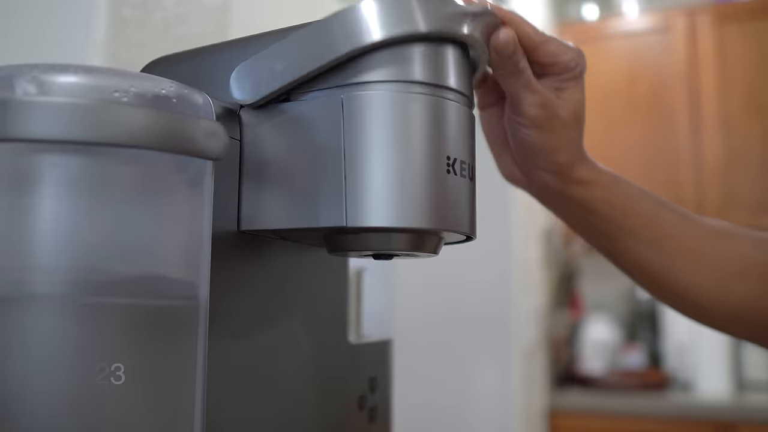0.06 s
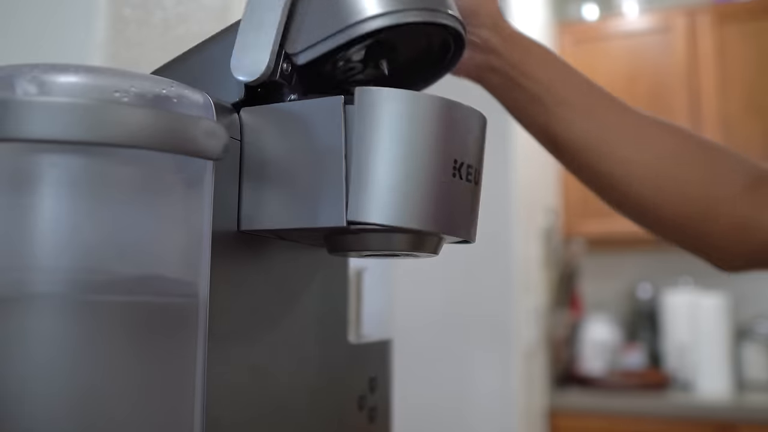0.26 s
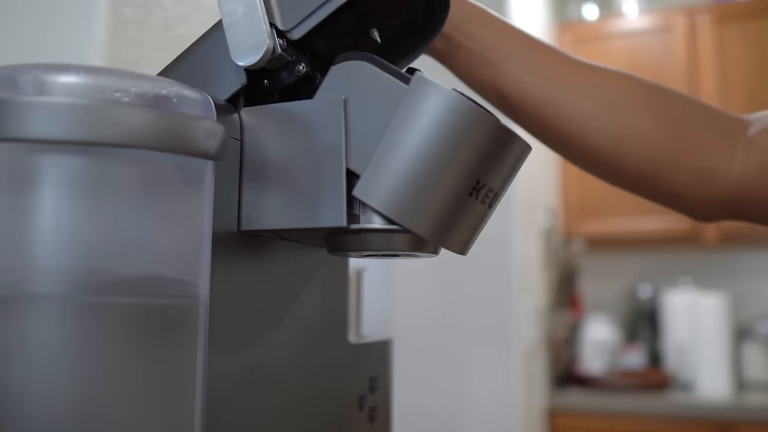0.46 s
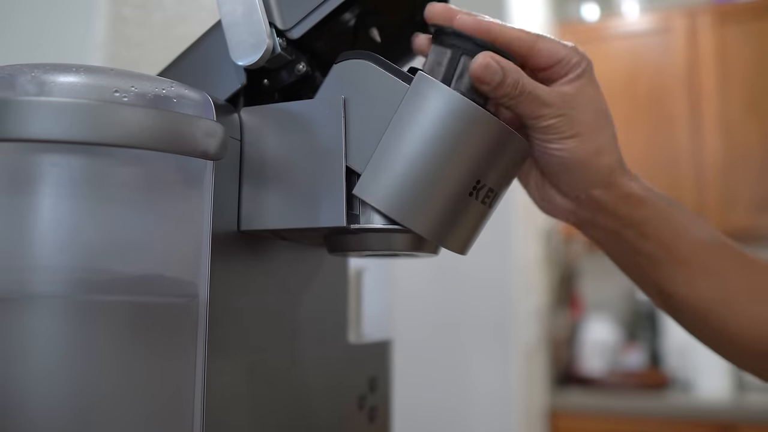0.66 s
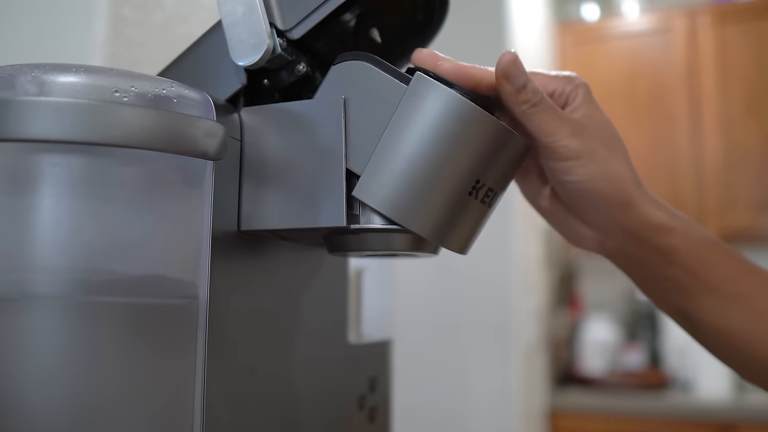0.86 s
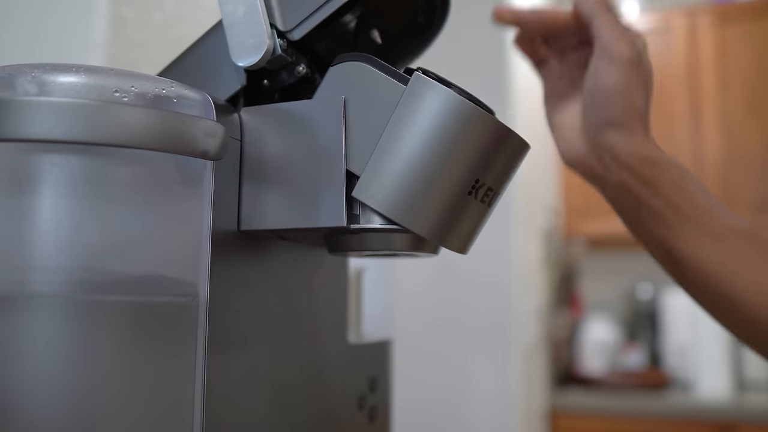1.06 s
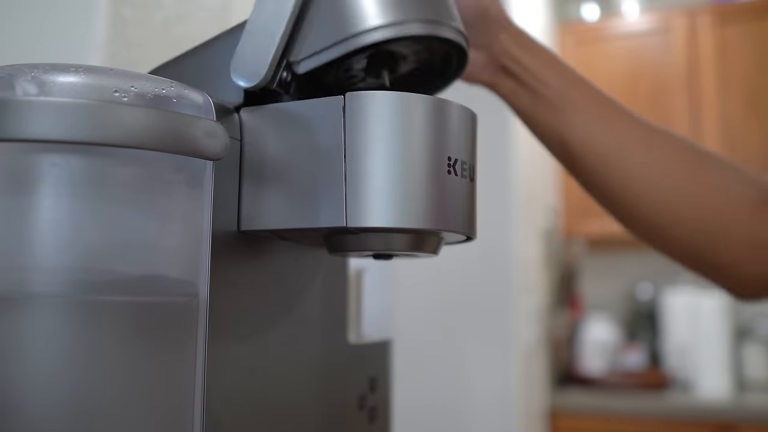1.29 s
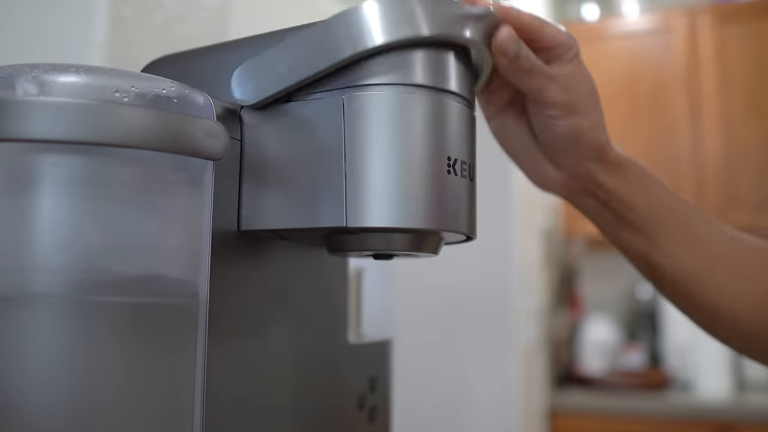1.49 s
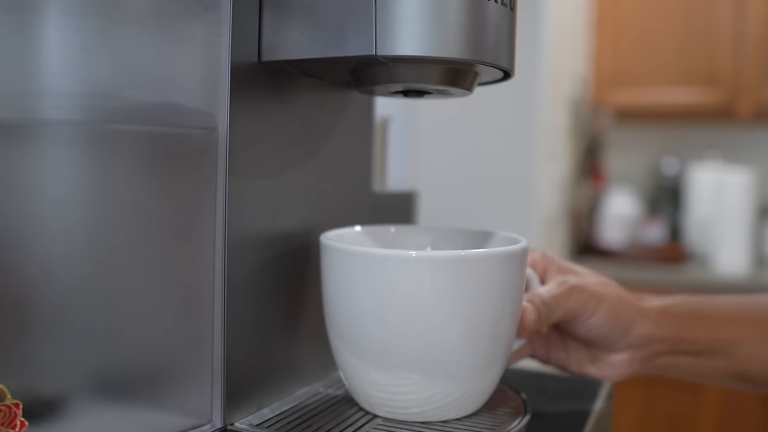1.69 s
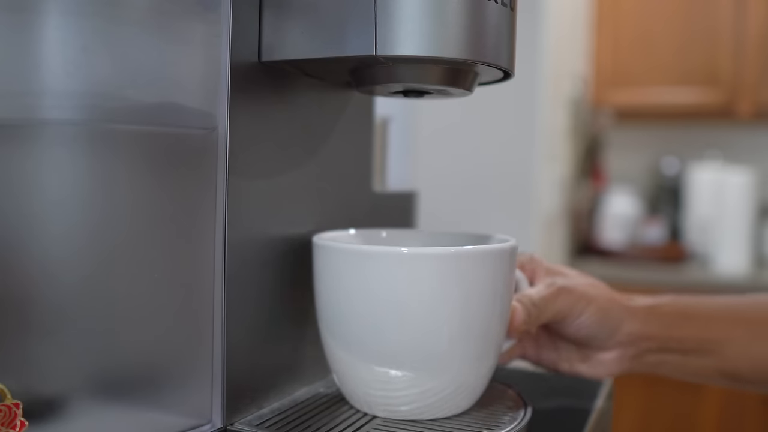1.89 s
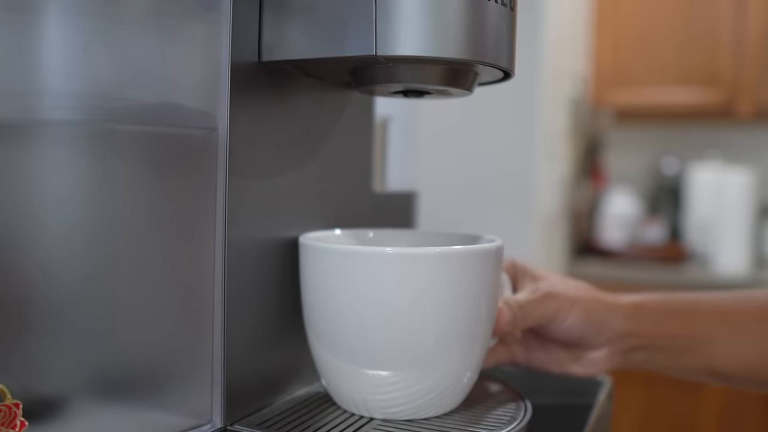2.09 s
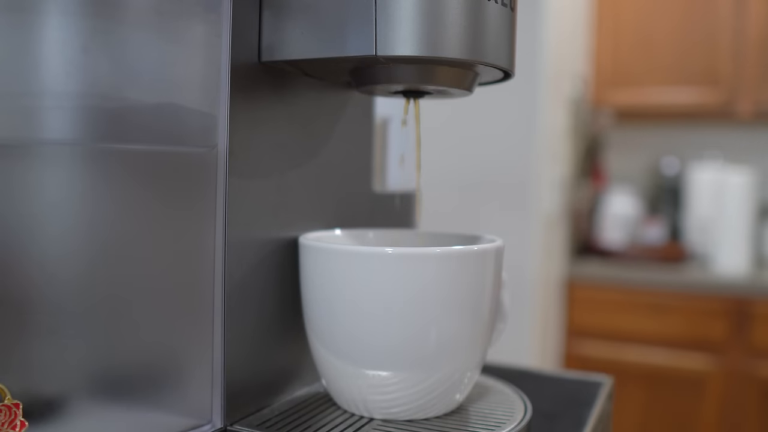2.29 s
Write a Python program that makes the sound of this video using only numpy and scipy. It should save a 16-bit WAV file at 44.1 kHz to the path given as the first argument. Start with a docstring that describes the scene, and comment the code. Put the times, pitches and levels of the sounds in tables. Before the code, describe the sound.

Close plastic clicks and clunks as a coffee machine is opened, loaded with a pod and clamped shut. A china mug then knocks onto the hollow tray, slides squeaking and settles, over a low hum in a small kitchen.

```python
"""A coffee machine in a small kitchen, close by, over a mains hum and low room rumble. Its plastic lid
unlatches and swings up, a pod is dropped in and pressed home, and the lid is clamped shut, shaking the
counter. These sounds stop abruptly. Then a china mug lands ringing on the hollow drip tray, scrapes
and squeaks into place and settles with a soft bump; last, fingers tick off its handle."""
import sys
import numpy as np
from scipy import signal
from scipy.fft import rfft, irfft
from scipy.io import wavfile
from scipy.ndimage import uniform_filter1d

SR = 44100
rng = np.random.default_rng(int(sys.argv[2]) if len(sys.argv) > 2 else 0)


def transcribe(u):
    """Save the signal u as a 16-bit wav file named by the first command-line argument.

    u: samples, shape (n,) or (channels, n), limited to [-1, 1]; the rate is SR.
    q: integer samples, one column per channel.
    """
    v = np.clip(np.atleast_2d(u).T, -1, 1)
    q = np.round(v * 32767).astype(np.int16)
    wavfile.write(sys.argv[1], SR, q)


N = 108045
TIME = np.arange(N) / SR


def amp(db):
    """Decibels to gain."""
    return 10 ** (np.asarray(db) / 20)


def unit_rms(x):
    """Scales to rms 1."""
    return x / np.sqrt(np.mean(x ** 2) + 1e-20)


def at_hz(points, hz):
    """Reads a table on a log-frequency axis."""
    f, value = np.transpose(points)
    return np.interp(np.log(hz + 1), np.log(f + 1), value)


def fader(points):
    """Gain over time from a level curve, silent outside it."""
    s, db = np.transpose(points)
    return amp(np.interp(TIME, s, db)) * (TIME >= s[0]) * (TIME <= s[-1])


def add(mix, s, sound):
    """Mixes a sound in at time s."""
    part = mix[max(round(s * SR), 0):][:len(sound)]
    part += sound[:len(part)]


def eq(x, points, lo_hz=0, hi_hz=SR):
    """Filters by a dB spectrum, between two soft band edges."""
    hz = np.fft.rfftfreq(x.shape[-1], 1 / SR) + 1
    band = 1 / np.sqrt((1 + (lo_hz / hz) ** 10) * (1 + (hz / hi_hz) ** 10))
    return irfft(rfft(x) * amp(at_hz(points, hz)) * band, x.shape[-1])


def noise(colour, lo_hz=0, hi_hz=SR):
    """Coloured noise of rms 1."""
    return unit_rms(eq(rng.standard_normal(N), colour, lo_hz, hi_hz))


def wander(hz):
    """Smooth random motion of rms 1."""
    return noise([(1, 0)], hi_hz=hz)


def ring(modes, attack_s=0.0016):
    """A struck part rings as dying sines of random phase."""
    t = TIME[:SR // 2]
    sines = (amp(db - 60 * t / t60) * np.sin(2 * np.pi * (hz * t + rng.random()))
             for hz, db, t60 in modes)
    return np.minimum(t / attack_s, 1) * sum(sines)


def with_send(sound, room_db):
    """Pairs a direct sound with its room send."""
    return np.array([sound, sound * amp(room_db)])


# room tone, heavy in the lows (frequency [Hz], level [dB])
ROOM_TONE = [(15, -33), (25, -10.5), (114, -6), (223, -12), (840, -31.5), (1130, -38), (1520, -35.5),
             (1650, -36.5), (3430, -40), (14000, -40), (16000, -39)]
# stereo width of the room (frequency [Hz], side against mid [dB])
ROOM_WIDTH = [(150,-22.5),(350,-15),(700,-6.5),(1400,-8),(2800,-4.5),(7000,-0.5),(14000,-5)]
def background(tone_db=-50.5, hum_hz=121.6, hum_db=-51.5):
    """Room rumble, faint hiss and mains hum."""
    mid = amp(tone_db) * noise(ROOM_TONE)
    side = eq(amp(tone_db) * noise(ROOM_TONE), ROOM_WIDTH)
    hum = amp(hum_db) * unit_rms(np.sin(2 * np.pi * hum_hz * TIME))
    return mid + np.array([side, -side]) + hum


def reflections(t60, gap_s):
    """Dense, evenly coloured reflections after a gap, each band dying at its own speed."""
    hz, t, bands = signal.stft(rng.standard_normal(SR), SR, nperseg=256)
    decay = amp(-60 * t / at_hz(t60, hz)[:, None])
    tail = signal.istft(bands * decay, SR, nperseg=256)[1][:SR]
    spectrum = rfft(np.roll(tail, round(gap_s * SR)))
    colour = np.sqrt(uniform_filter1d(abs(spectrum) ** 2, size=45))
    tail = irfft(spectrum / colour, SR) * (TIME[:SR] > gap_s) * (TIME[:SR] < .7)
    return tail / np.linalg.norm(tail)


# reverb decay (frequency [Hz], t60 [s])
ROOM_DECAY = [(150,0.53),(400,0.51),(1000,0.45),(2800,0.38),(7000,0.25),(15000,0.24)]
# stereo width of the scatter off the machine (frequency [Hz], side against mid [dB])
SCATTER_WIDTH = [(150,-44.5),(600,-16),(1300,-15),(2500,-7),(7000,-6),(14000,-6.5)]
def kitchen(direct, send, scatter_t60=0.012):
    """Direct sound, scatter off the machine that spreads it left and right, and the room's tail."""
    scatter = signal.fftconvolve(direct, reflections([(1000, scatter_t60)], gap_s=0.00121))[:N]
    wet_mid, wet_side = (signal.fftconvolve(send, reflections(ROOM_DECAY, gap_s=.004))[:N]
                         for _ in range(2))
    side = eq(scatter, SCATTER_WIDTH) + eq(wet_side, ROOM_WIDTH)
    return direct + wet_mid + np.array([side, -side])


def rub(curve, colour, chatter_db, chatter_hz, room_db, grains_per_s=9000, spread_db=1):
    """Stick-slip grains, unevenly pressed, coloured by the rubbed part; gives direct and send."""
    sizes = amp(spread_db * np.minimum(rng.exponential(1, N), 4))
    grains = sizes * rng.standard_normal(N) * (rng.random(N) < grains_per_s / SR)
    pressure = amp(chatter_db * wander(chatter_hz))
    return with_send(fader(curve) * unit_rms(eq(grains * pressure, colour)), room_db)


# a knock's thud, body, clack and tick bands (low [Hz], high [Hz], t60 [s], room send [dB])
KNOCK_BANDS = [(131,530,0.065,-5),(558,2290,0.051,-8),(2430,5240,0.045,-8),(5470,34300,0.016,-10)]
def knocks(hits, colour, modes):
    """Each knock swells, then dies as a noise burst and any ringing modes; gives direct and send."""
    out, t = np.zeros((2, N)), TIME[:SR // 2]
    for s, rise_s, *levels in hits:
        swell = np.minimum(t / rise_s, 1) ** 2
        for db, (lo, hi, t60, room_db) in zip(levels, KNOCK_BANDS):
            envelope = swell * amp(-60 * np.maximum(t - rise_s, 0) / t60)
            burst = envelope * eq(rng.standard_normal(len(t)), colour, lo, hi)
            burst *= np.linalg.norm(envelope) / np.linalg.norm(burst)
            ringing = swell * ring([mode for mode in modes if lo <= mode[0] < hi])
            sound = amp(db) * (burst + ringing)
            add(out[0], s, sound)
            add(out[1], s, sound * amp(room_db))
    return out


# sleeve rustle: fader (time [s], level [dB]) and EQ (frequency [Hz], gain [dB])
SLEEVE_FADER = [(1.9,-61),(2.08,-50.5),(2.17,-50),(2.28,-61),(2.32,-44.5),(2.36,-51),(2.4,-44),(2.45,-50.5)]
SLEEVE_EQ = [(120, -37), (200, -17), (347, 0), (569, -27), (867, -17.5), (1140, -18), (7540, -32.5),
             (9580, -27.5), (16000, -36)]
# ticks on the handle (time [s], rise [s], thud [dB], body [dB], clack [dB], tick [dB])
FINGER_TICKS = [(2.370,0.0022,-51,-51,-65,-41),(2.428,0.00045,-58,-59,-39.5,-29)]
# bright tone of china, touched or sliding (frequency [Hz], gain [dB])
CHINA_EQ = [(290, -26), (500, -6), (604, -10.5), (974, -23.5), (1360, -7), (1480, -5), (3980, -3.5),
            (4530, -3.5), (4870, -2.5), (5630, -12), (6330, -6.5), (8330, -15.5), (14000, -15),
            (16000, -25)]
def hand():
    """Sleeve and hand shuffle as the mug is let go, and fingers tick off its handle."""
    direct, send = knocks(FINGER_TICKS, CHINA_EQ, modes=[])
    return np.array([direct + fader(SLEEVE_FADER) * noise(SLEEVE_EQ, lo_hz=170), send])


# the mug's foot hitting the tray (time [s], level [dB])
TRAY_HITS = [(1.755,-24.5),(1.78,-35.5)]
# the landing's boom and the bump's ring-out (frequency [Hz], level against the hit [dB], t60 [s])
BOOM_MODES = [(106,2.5,.13),(138,-9.5,0.14),(271.3,-12,0.22),(336,-8.5,0.61),(400,-10,0.26),(503,-18,0.1)]
BUMP_MODES = [(146,-23,0.15),(228,-32,.25),(405,-17.5,0.43)]
def tray(bump_s=2.1623, bump_hz=335, bump_width_s=0.0022, bump_db=-13):
    """The hollow tray booms as the mug lands and gives one soft bump as it settles."""
    boom, ring_out = np.zeros((2, N))
    for s, db in TRAY_HITS:
        add(boom, s, amp(db) * ring(BOOM_MODES))
    t = TIME - bump_s
    pulse = np.exp(-(t / bump_width_s) ** 2) * np.sin(2 * np.pi * bump_hz * t)
    add(ring_out, bump_s, ring(BUMP_MODES))
    bump = amp(bump_db) * (ring_out - pulse)
    return with_send(boom, room_db=-5.5) + with_send(bump, room_db=-11.5)


# the landing scrape and the slide after it (time [s], level [dB])
SCRAPE_FADER = [(1.749,-64),(1.753,-24),(1.765,-25),(1.787,-25),(1.81,-33.5),(1.85,-43.5),(1.87,-33.5),(1.9,-40.5),(1.99,-46.5)]
SLIDE_FADER = [(1.85,-47),(1.93,-45),(1.985,-43.5),(2.005,-32.5),(2.05,-32),(2.105,-38),(2.13,-35.5),(2.16,-41.5),(2.185,-74),(2.25,-49.5),(2.29,-62)]
# tone of the scrape (frequency [Hz], gain [dB])
SCRAPE_EQ = [(120, -34), (200, -0.5), (353, -3), (601, -12), (709, -5.5), (851, -18), (2020, -7),
             (2290, -14), (2700, -8), (3620, -12), (4430, -5.5), (5840, -21.5), (6640, -16), (14100, -31),
             (16000, -43)]
# ring of the china (frequency [Hz], relative level [dB], t60 [s])
CHINA_MODES = [(1342,-5.5,0.19),(2092,-1.5,0.33),(2840,-14,.15),(3080,-6,0.15),(3445,-16,.17),(3763,-16,.15),(4000,-16,.12),(4540,-9,0.11),(4970,-8,.08)]
# squeaks of the foot (time [s], length [s], pitch [Hz], level [dB])
FOOT_SQUEAKS = [(1.925,0.053,6100,-39),(2.035,.035,4600,-26),(2.04,0.079,6000,-36),(2.055,.035,14100,-39),(1.751,0.012,14200,-30)]
def mug(ring_db=-8, squeak_wobble=.014):
    """The unglazed foot chatters over the tray, rings the china as it lands and squeaks as it slides."""
    scrape = rub(SCRAPE_FADER, SCRAPE_EQ, chatter_db=2, chatter_hz=149, room_db=-9)
    slide = rub(SLIDE_FADER, CHINA_EQ, chatter_db=1.5, chatter_hz=89.5, room_db=-7)
    ringing = unit_rms(signal.fftconvolve(scrape[0], ring(CHINA_MODES))[:N])
    china = amp(ring_db) * scrape[0].std() * ringing
    for s, length, hz, db in FOOT_SQUEAKS:
        arch = np.hanning(round(length * SR))
        pitch = hz * (1 + squeak_wobble * wander(hz=500)[:len(arch)])
        add(china, s, amp(db) * arch * np.sin(2 * np.pi * np.cumsum(pitch) / SR))
    return scrape + slide + with_send(china, room_db=-34)


# holder and pod knocks (time [s], rise [s], thud [dB], body [dB], clack [dB], tick [dB])
POD_KNOCKS = [(.566,0.00076,-50,-37.5,-65,-68),(.647,0.0015,-44,-67,-41,-37),(.655,0.0014,-38,-21,-29,-30),(.660,0.0033,-25.5,-24,-39,-37),(.693,0.0033,-32,-39,-44,-54),(.826,0.0025,-36,-27.5,-38,-30),(.846,0.0021,-39.5,-19.5,-21.5,-23),(.8575,0.0018,-27.5,-11,-22.5,-12.5),(.871,0.003,-30,-12,-19.5,-19.5),(.885,0.0025,-25,-24.5,-34.5,-37),(.927,0.00073,-36,-44,-30.5,-23.5)]
# their plastic tone (frequency [Hz], gain [dB]) and ring (frequency [Hz], relative level [dB], t60 [s])
POD_EQ = [(59, -45), (100, -15), (219, -6), (481, -20), (621, -11), (1150, -9), (1520, -16.5), (1830, -10),
          (2750, -24), (4110, -22.5), (5420, -31), (6420, -20.5), (13200, -25.5), (14700, -28),
          (16000, -22.5)]
POD_MODES = [(624,-26.5,0.19),(710,-37,.2),(819,-38,.3),(1072,-22,0.19),(1172,-8.5,0.13),(1285,-25,0.21),(1450,-29,0.24),(1867,-15.5,0.086),(2600,-11,0.13),(3800,-16.5,0.076),(3870,-15,0.11),(6440,-23,0.068),(6880,-14,.07)]
# pod friction: fader (time [s], level [dB]) and EQ (frequency [Hz], gain [dB])
POD_RUB_FADER = [(.66,-68),(.72,-52),(.79,-44.5),(.808,-37),(.825,-35),(.85,-45.5),(.94,-43),(.97,-50.5),(1.03,-41.5),(1.06,-65)]
POD_RUB_EQ = [(240, -29), (400, 4.5), (1840, -2.5), (2550, -13), (4310, -6.5), (6340, -14), (7400, -6.5),
              (16000, -17.5)]
def pod():
    """The holder swings out; the pod knocks into it and rubs as it is pressed home."""
    friction = rub(POD_RUB_FADER, POD_RUB_EQ, chatter_db=2, chatter_hz=100, room_db=-6)
    return knocks(POD_KNOCKS, POD_EQ, POD_MODES) + friction


# lid and latch knocks (time [s], rise [s], thud [dB], body [dB], clack [dB], tick [dB])
LID_KNOCKS = [(.059,0.0014,-42.5,-59,-43,-51),(.080,0.0012,-33.5,-46,-45.5,-37.5),(.109,0.0028,-39,-36,-47.5,-52),(.227,0.004,-29.5,-27,-22,-17.5),(.256,0.0026,-33,-21,-26.5,-23.5),(.263,0.0015,-22.5,-39,-33,-41),(.277,0.0015,-23,-35,-54,-52),
              (.315,0.0022,-53,-26,-43,-45),(.329,0.0026,-33,-23,-23.5,-27),(.352,0.0021,-42,-25.5,-37,-54),(.405,0.0019,-36,-28,-31,-43),(.460,0.00061,-40,-28,-31,-40.5),(.465,0.0011,-30.5,-24,-29.5,-39.5),
              (1.185,0.0046,-35,-32,-28.5,-24.5),(1.255,0.0037,-39,-27.5,-29.5,-35.5),(1.294,0.00094,-42,-22.5,-31,-31),(1.298,0.0014,-34.5,-21.5,-17,-36),(1.303,0.0031,-22.5,-18.5,-15,-12.5),(1.326,.002,-31,-21,-37,-41),
              (1.354,0.0018,-31,-23,-31,-32),(1.358,0.00054,-31,-11.5,-14.5,-21.5),(1.365,0.0021,-18,-18,-40,-41),(1.384,0.003,-28,-23,-35,-51),(1.399,0.0051,-32,-25,-27,-23.5),(1.427,0.0015,-30,-29.5,-29,-41),
              (1.464,0.0024,-41,-45,-32,-48),(1.564,0.0042,-36,-24,-27,-37),(1.599,0.0017,-27,-44,-33.5,-32.5),(1.615,0.0022,-31.5,-31,-31.5,-36),(1.636,0.0052,-28.5,-64,-52,-55)]
# their plastic tone (frequency [Hz], gain [dB]) and ring (frequency [Hz], relative level [dB], t60 [s])
LID_EQ = [(59, -53), (100, -13), (193, -2), (283, 2.5), (513, -9), (558, -9), (872, -9.5), (1170, -3.5),
          (1760, -3.5), (2520, -19.5), (4110, -17), (4870, -29.5), (6700, -21.5), (8830, -32), (9820, -26),
          (13500, -37), (16000, -41)]
LID_MODES = [(232.5,-19,.35),(291.2,-15,0.18),(329,-20,0.12),(658,-15,0.1),(1165,-28,0.56),(1384,-20,0.28),(1535,-16,0.18),(1700,-22,0.11),(3140,-42,0.059),(3937,-17.5,0.075),(6530,-9,0.03),(6400,-7.5,0.046),(7030,2,0.017),(11740,-11.5,0.036)]
# hinge friction: fader (time [s], level [dB]) and EQ (frequency [Hz], gain [dB])
HINGE_FADER = [(.055,-78),(.065,-47),(.2,-44),(.3,-37),(.345,-28),(.42,-40.5),(.5,-47),(.6,-53),(.63,-55),(1.17,-55),(1.2,-47),(1.25,-45),(1.32,-20.5),(1.43,-46),(1.52,-42),(1.6,-37),(1.69,-59)]
HINGE_EQ = [(76, -33), (130, -2), (309, 4.5), (565, -4.5), (692, 0), (829, -3), (1860, -8.5), (2890, -13),
            (3910, -16), (4680, -19), (6600, -21.5), (14200, -33), (16000, -42)]
# sub-bass shudder of the counter (time [s], level [dB])
SHUDDER_FADER = [(1.3,-75),(1.36,-41),(1.45,-42),(1.56,-47),(1.62,-80)]
def lid():
    """The lid knocks as its catch slips, rubs at the hinge and shakes the counter as it clamps."""
    hinge = rub(HINGE_FADER, HINGE_EQ, chatter_db=3.5, chatter_hz=80, room_db=-6.5)
    direct, send = knocks(LID_KNOCKS, LID_EQ, LID_MODES) + hinge
    shudder = fader(SHUDDER_FADER) * noise(ROOM_TONE, lo_hz=29, hi_hz=56)
    return np.array([direct + shudder, send])


def scene(loading_end_s=1.694):
    """Over the room tone, the machine is loaded and its sound gated off, tail and all; then the mug."""
    gate = np.clip((loading_end_s - TIME) / .002, 0, 1)
    loading = lid() + pod()
    serving = mug() + tray() + hand()
    return background() + kitchen(*loading) * gate + kitchen(*serving)


def record(dry, cutoff_hz=15900):
    """A steep low-pass takes off the highest treble."""
    low_pass = signal.firwin(401, cutoff_hz, window=("kaiser", 8), fs=SR)
    return signal.oaconvolve(dry, low_pass[None], "same")


dry = scene()
out = record(dry)
transcribe(out)
```